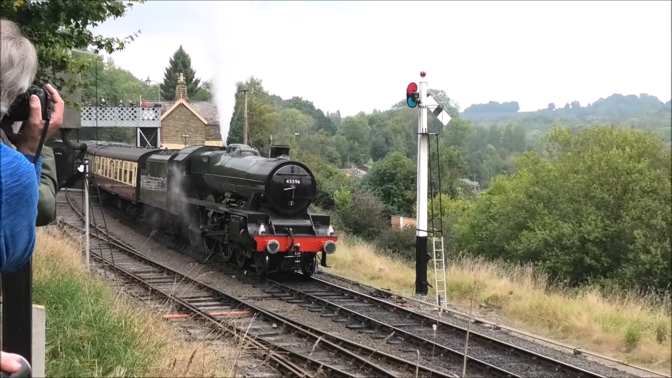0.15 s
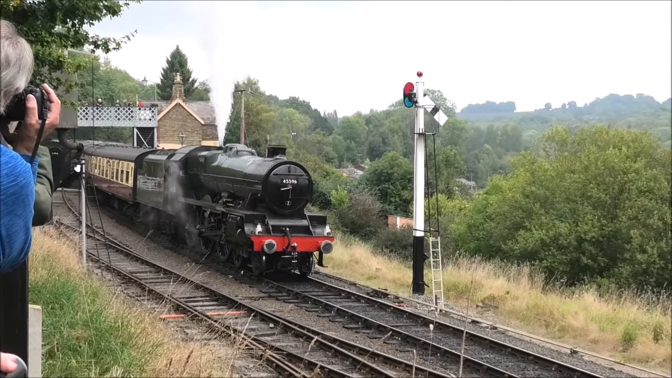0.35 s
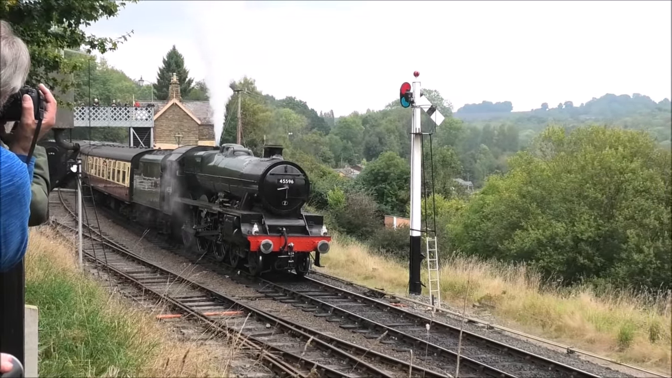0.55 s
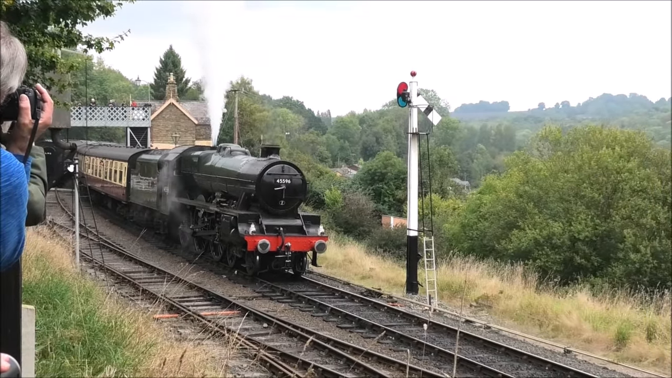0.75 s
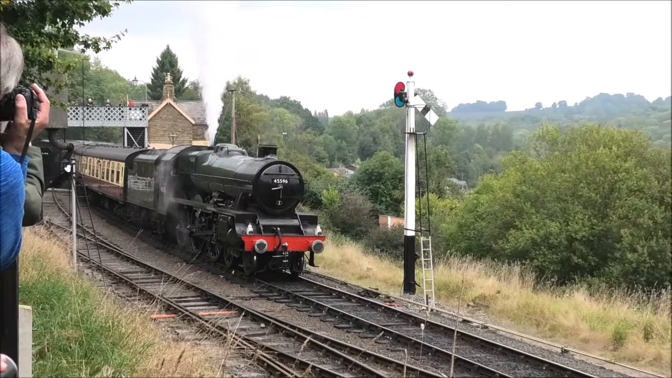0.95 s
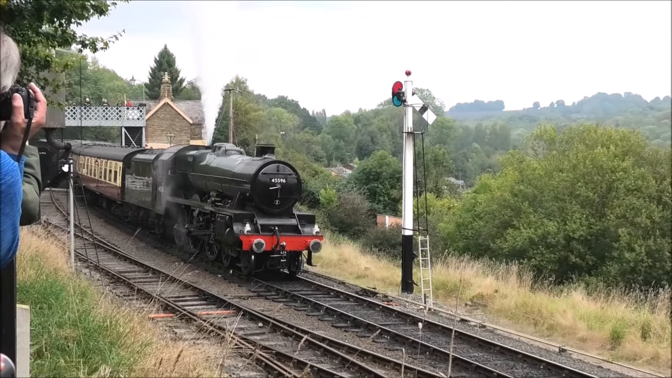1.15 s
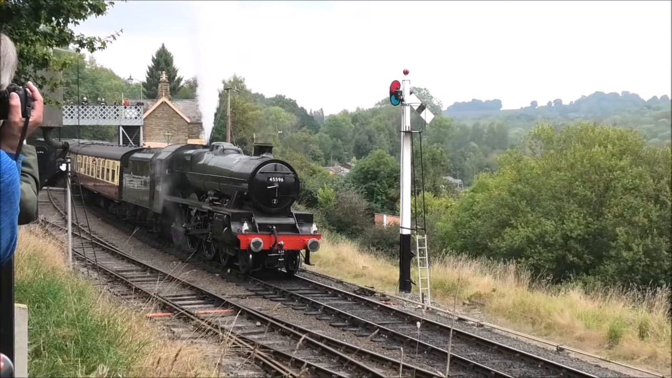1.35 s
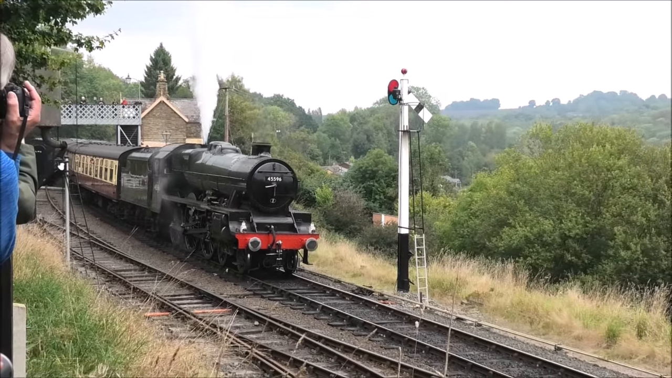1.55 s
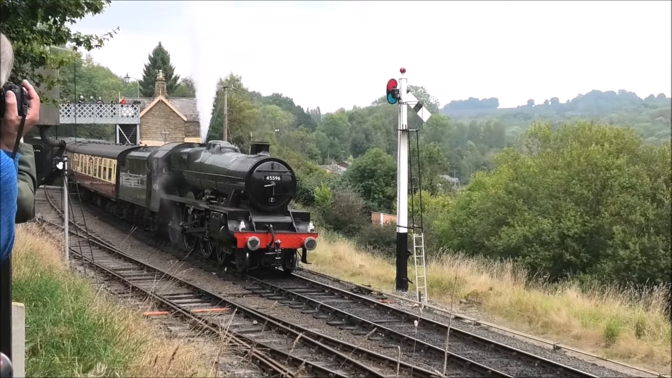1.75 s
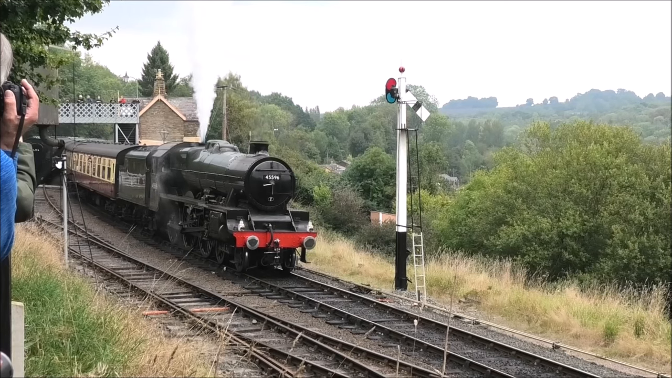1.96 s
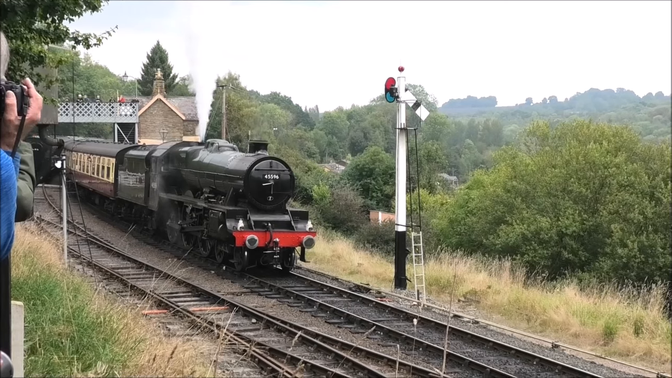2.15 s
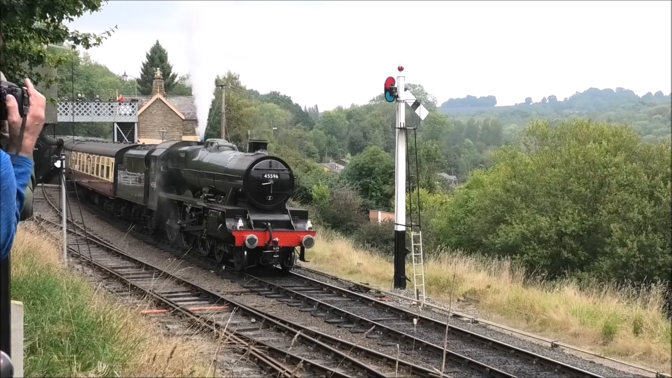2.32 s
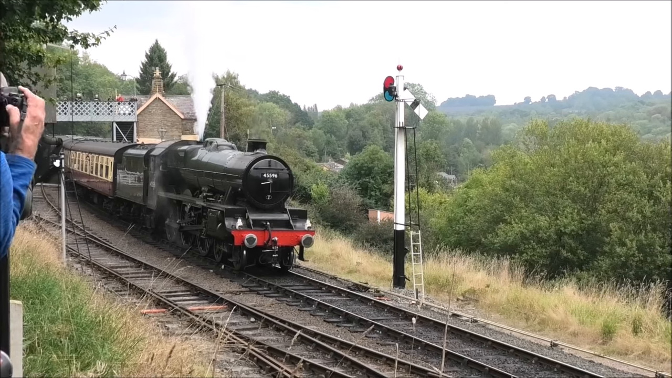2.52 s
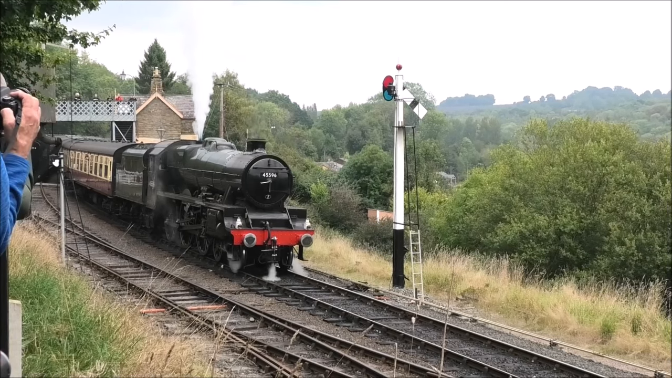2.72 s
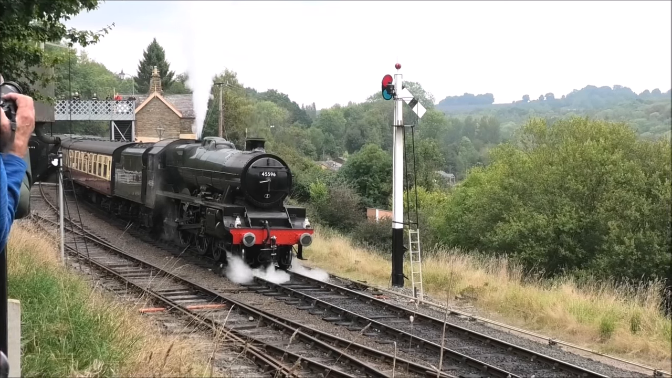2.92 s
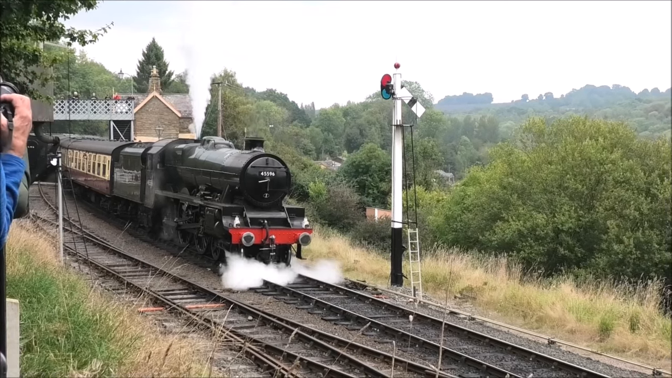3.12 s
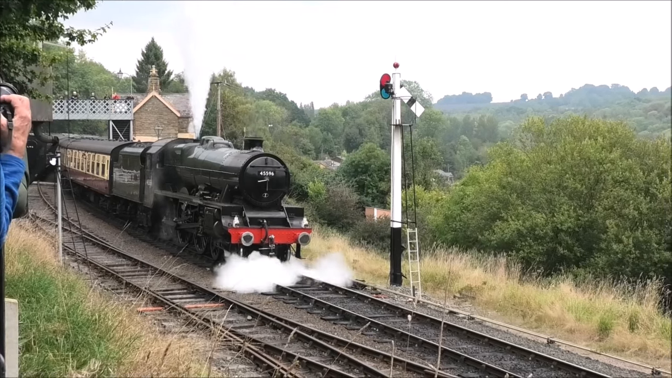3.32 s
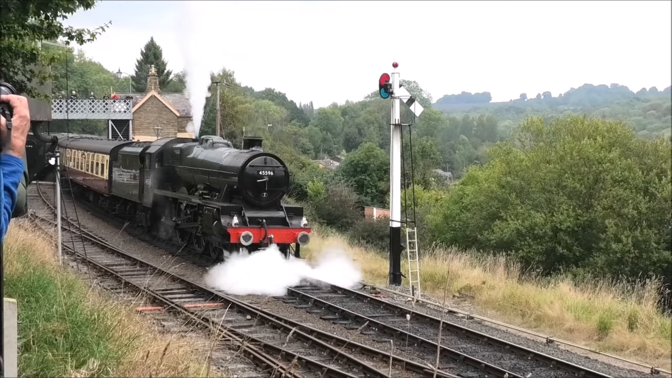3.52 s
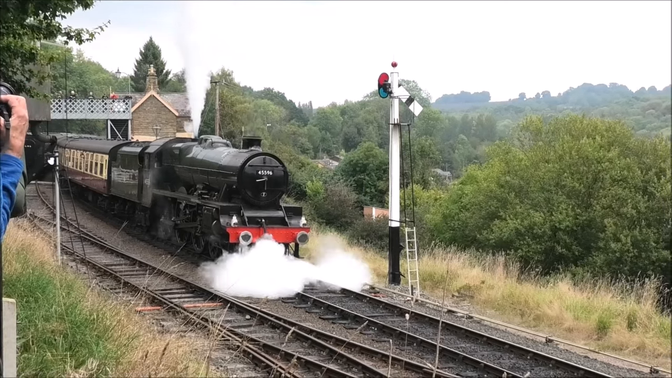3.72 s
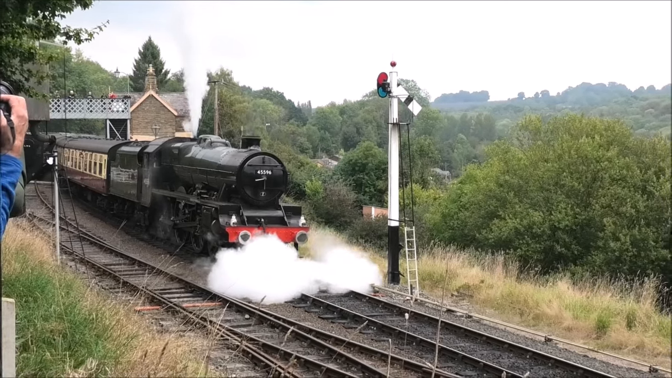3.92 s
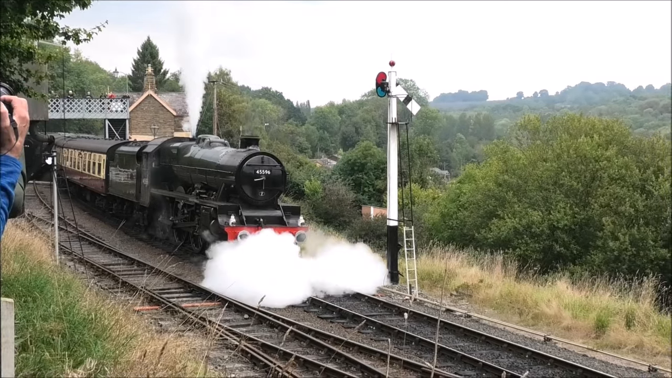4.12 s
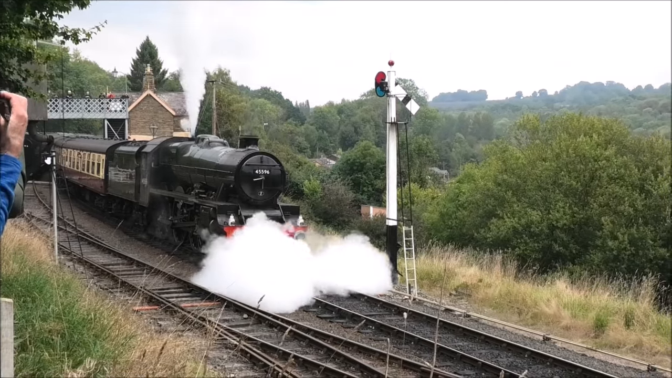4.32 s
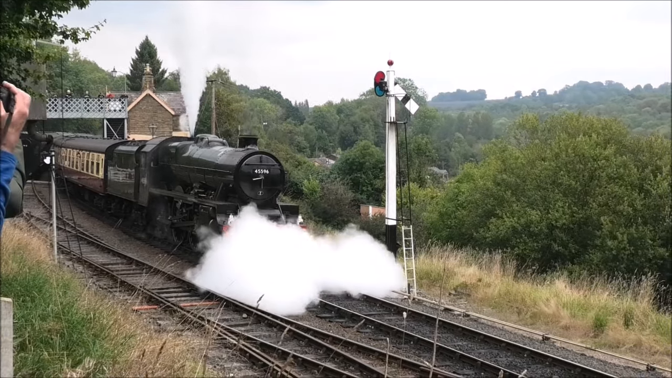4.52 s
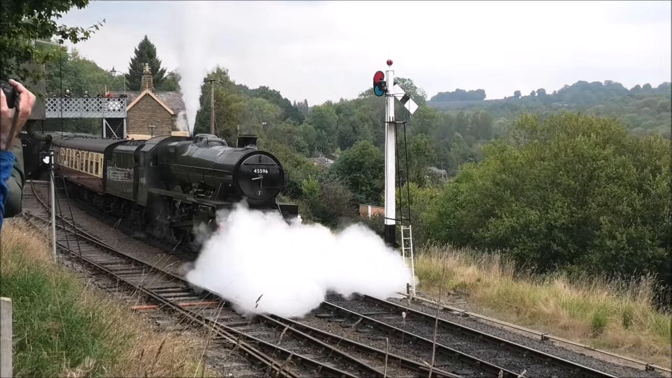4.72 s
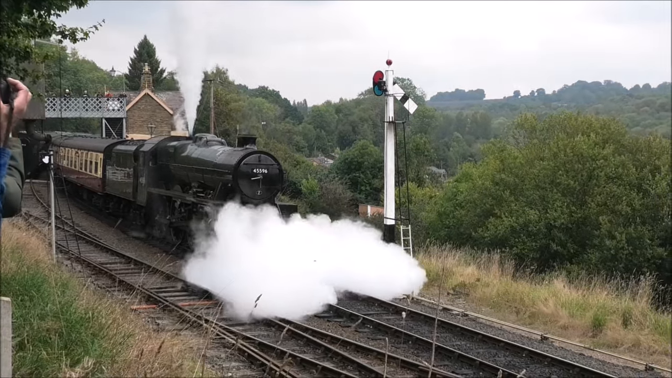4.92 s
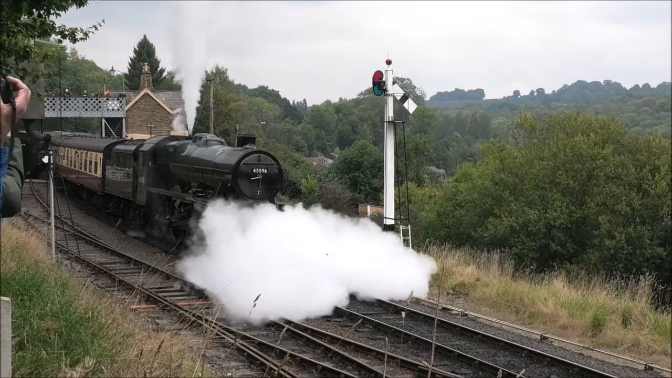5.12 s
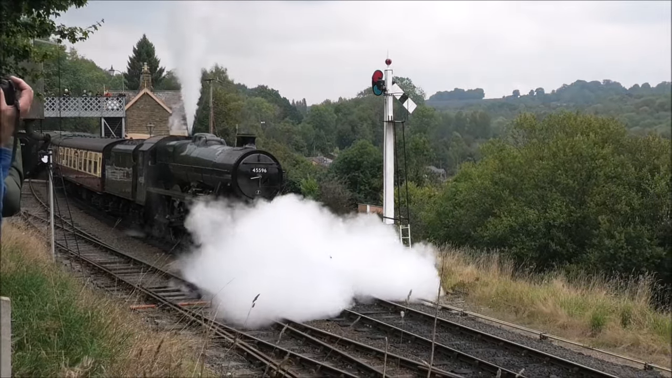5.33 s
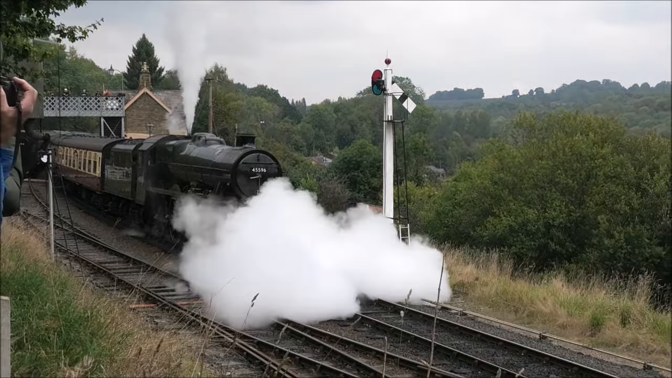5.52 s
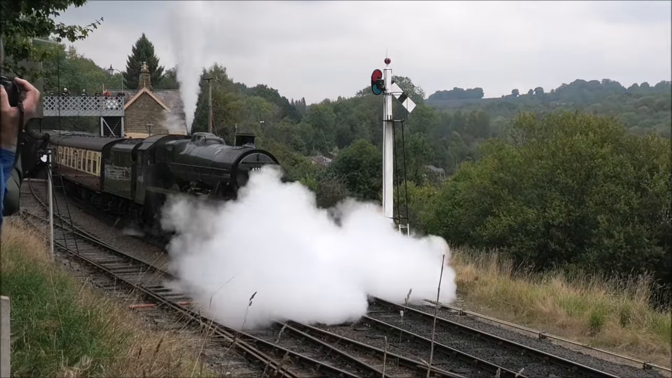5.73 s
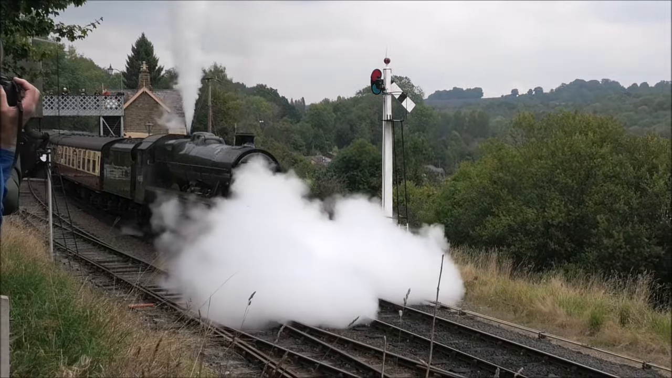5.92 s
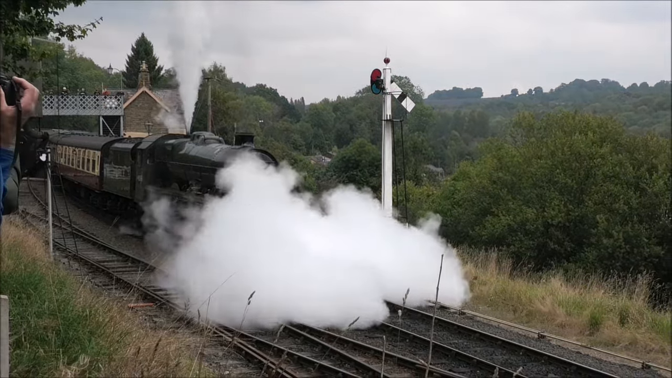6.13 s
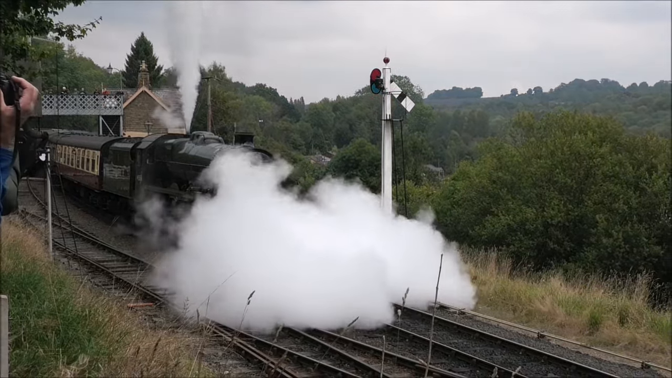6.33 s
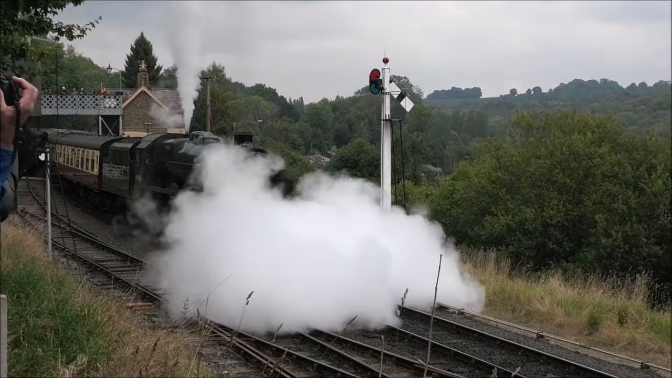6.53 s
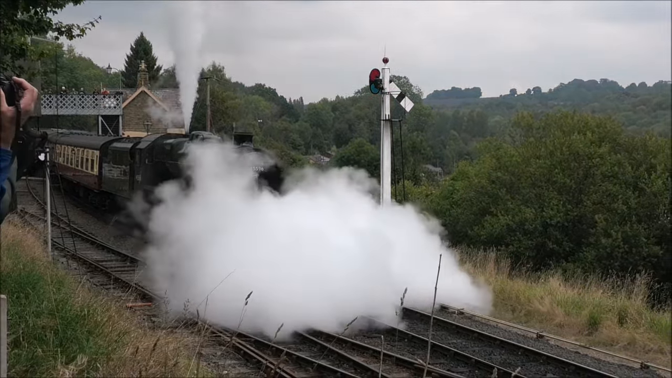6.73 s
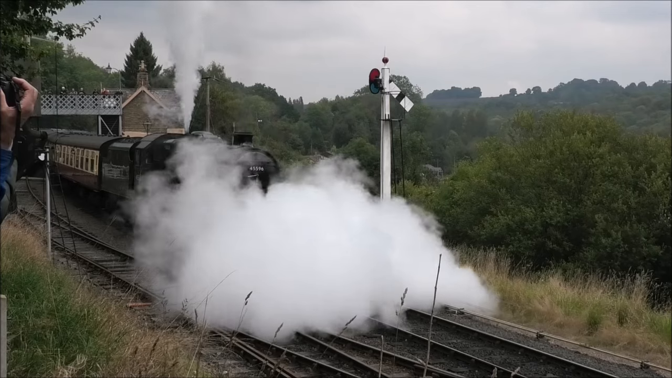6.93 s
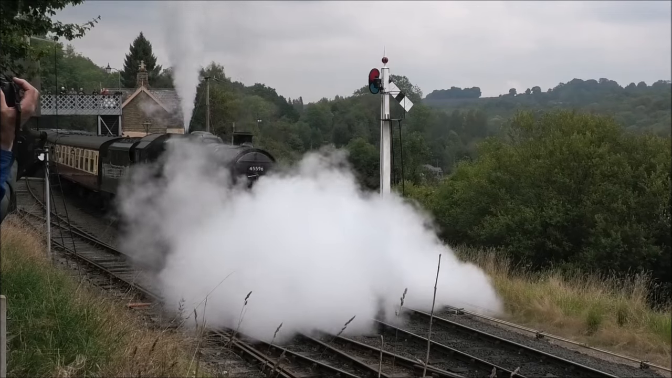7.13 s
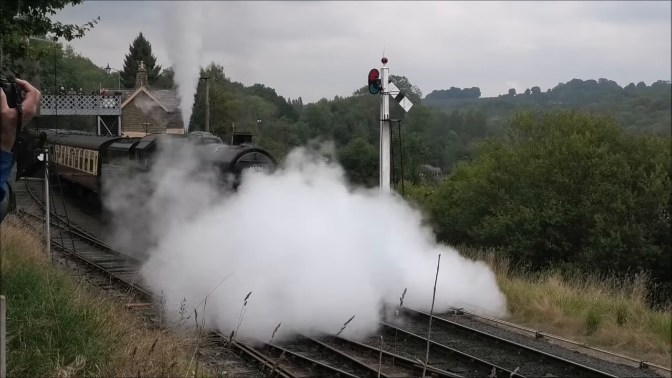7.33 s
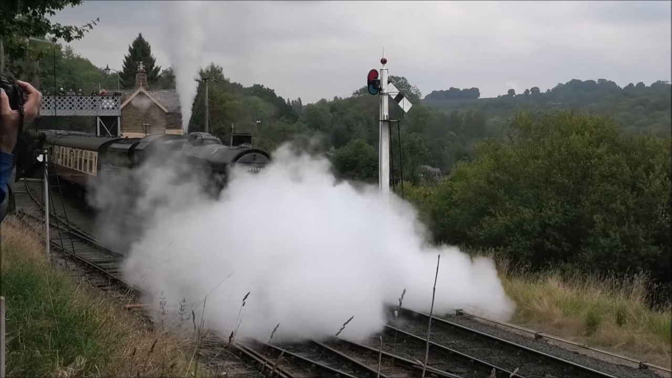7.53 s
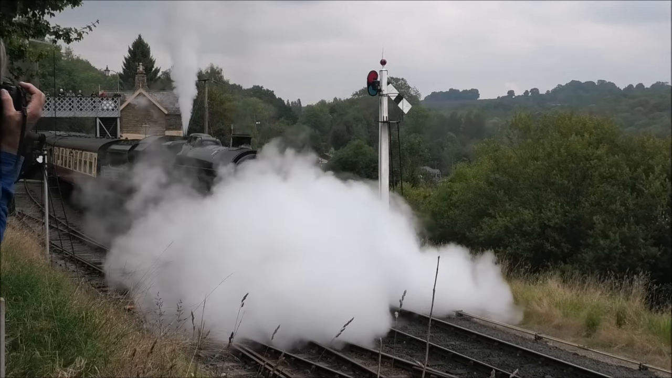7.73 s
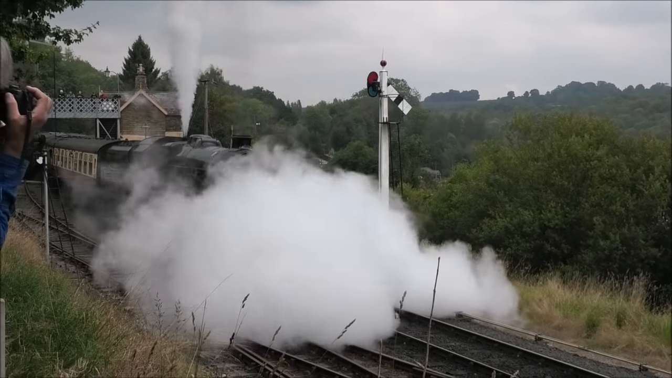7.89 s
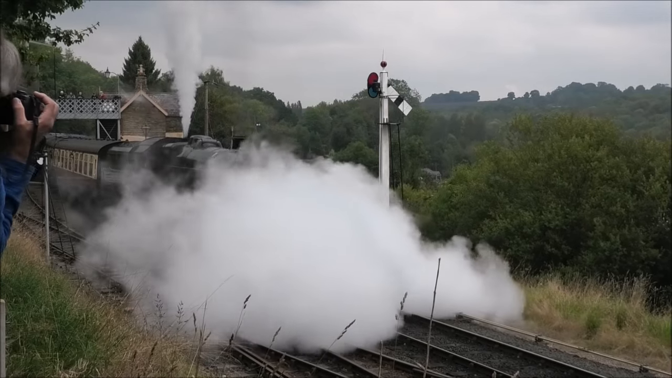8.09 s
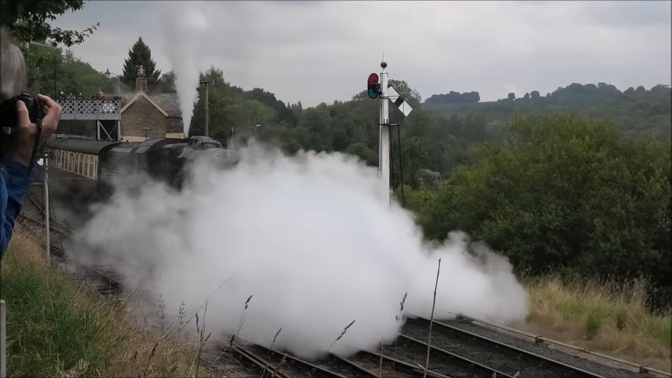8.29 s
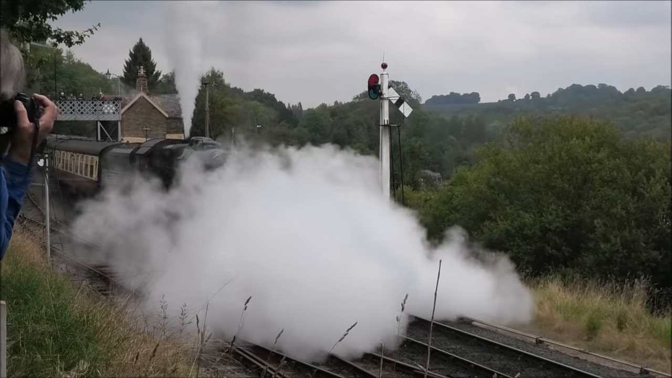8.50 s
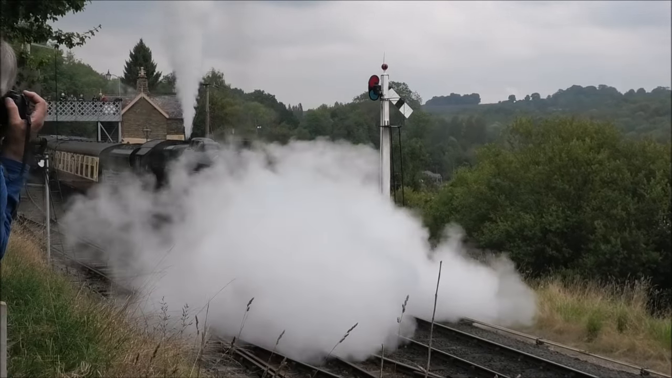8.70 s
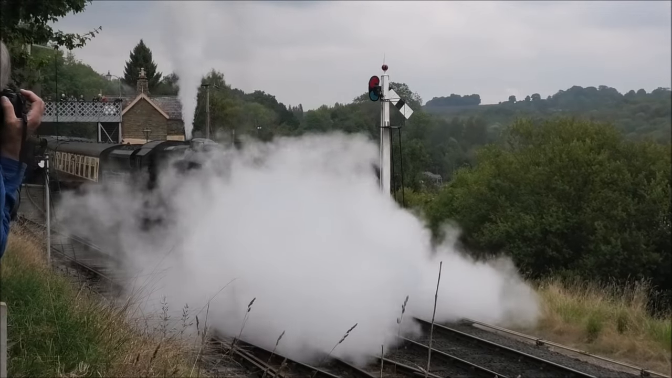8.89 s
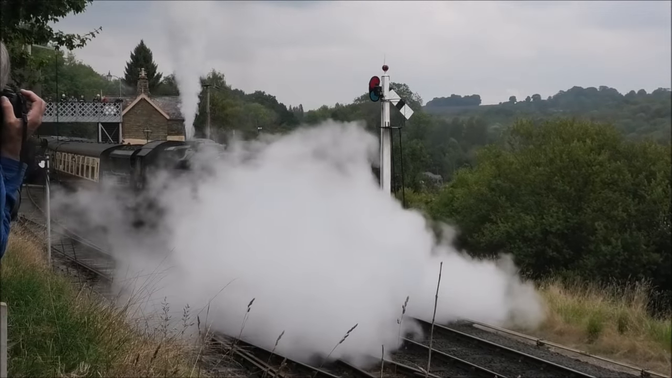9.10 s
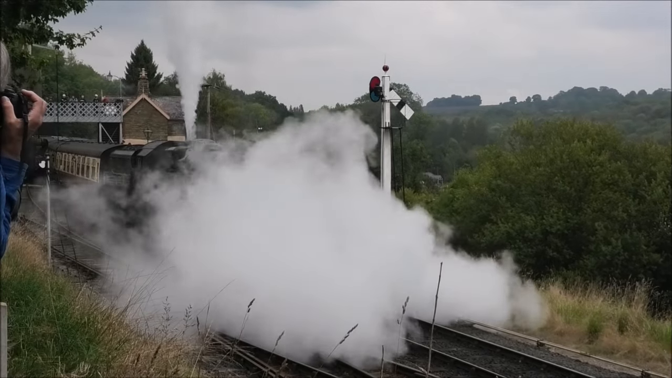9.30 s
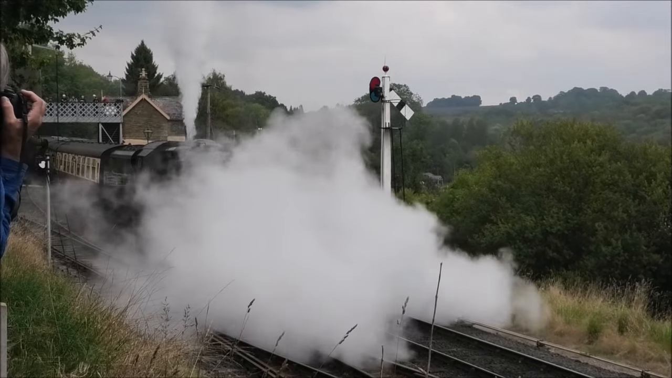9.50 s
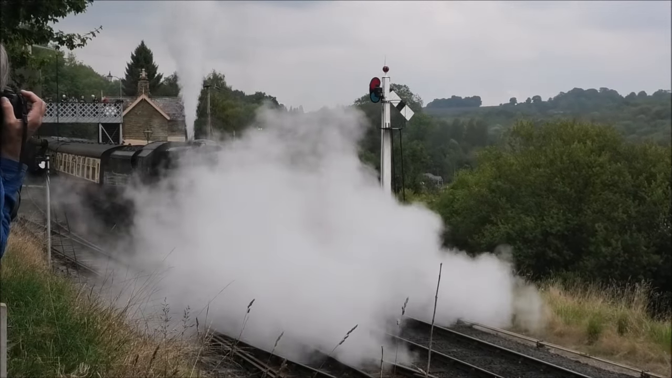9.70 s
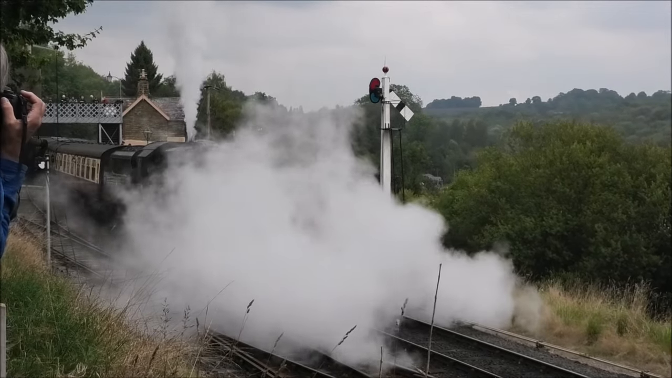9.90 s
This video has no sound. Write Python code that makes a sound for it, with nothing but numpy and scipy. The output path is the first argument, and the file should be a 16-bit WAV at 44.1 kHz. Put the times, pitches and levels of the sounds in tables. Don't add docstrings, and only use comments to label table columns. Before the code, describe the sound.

A steam engine's safety valve roars on while drain cocks blast wet steam for about three seconds, overloading the microphone, then abruptly close.

```python
import sys
import numpy as np
from scipy import signal
from scipy.fft import rfft, irfft, next_fast_len
from scipy.io import wavfile
from scipy.ndimage import uniform_filter1d

SR = 44100
rng = np.random.default_rng(int(sys.argv[2]) if len(sys.argv) > 2 else 0)


def amplitude_ratio(level_db):
    exponent = np.asarray(level_db, float) / 20
    return 10 ** exponent


def transcribe(signal):
    frames = np.atleast_2d(signal).T
    limited = np.clip(frames, -1, 1)
    pcm = np.round(limited * 32767).astype(np.int16)
    wavfile.write(sys.argv[1], SR, pcm)


N = 438779

TIME = np.arange(N) / SR
FFT_SIZE = next_fast_len(N)
HZ = np.arange(FFT_SIZE // 2 + 1) * SR / FFT_SIZE + 1e-3
STEPS = np.arange(0, N / SR + .01, .01)
SHUT_S = 6.374


def walk(rate):
    k = int(SR / rate)
    held = np.repeat(rng.standard_normal(N // k + 1), k)
    return 1.3 * uniform_filter1d(uniform_filter1d(held, k), k)[:N]


def jet(curve, bands, colour, gust_db, flicker_db):
    s, core_db, *rel_db = np.transpose(curve)
    hz, colour_db = np.transpose(colour)
    white = rfft(rng.standard_normal(N), FFT_SIZE)
    noise = white * amplitude_ratio(np.interp(np.log(HZ), np.log(hz), colour_db))
    power = 2 * np.abs(noise) ** 2 / (N * FFT_SIZE)
    own_db = [10 * np.log10(power[(HZ > lo) & (HZ < hi)].sum()) for lo, hi in bands]
    wanted_db = np.array([core_db] + [core_db + r for r in rel_db])
    gain_db = wanted_db - np.array(own_db)[:, None]
    centre = np.log2(np.prod(bands, axis=1)) / 2
    order = np.argsort(centre)
    out = 0
    gust = gust_db * walk(16)
    before = walk(14)
    for octave in np.arange(4.5, 14.6, .5):
        mask = np.cos(np.pi / 2 * np.clip(2 * (np.log2(HZ) - octave), -1, 1)) ** 2
        slow_db = [np.interp(octave, centre[order], g[order]) for g in gain_db.T]
        slow_db = np.interp(TIME, s, slow_db, left=-200, right=-200)
        fresh = walk(14)
        slice_db = slow_db + gust + flicker_db * (fresh + before)
        out = out + amplitude_ratio(slice_db) * irfft(noise * mask, FFT_SIZE)[:N]
        before = fresh
    return out


def stirred(steady_db, bands, eddies, opening_db, s):
    core_hz, reach_oct = 3075, .65
    octave = np.log2(np.sqrt(np.prod(bands, axis=1)) / core_hz)[:, None]
    db = np.array(steady_db)[:, None] + opening_db
    for at_s, length_s, gain_db, pitch in eddies:
        in_time = (2 * (s - at_s) / length_s) ** 2
        in_pitch = ((octave - pitch) / reach_oct) ** 2
        db = db + gain_db * np.exp(-in_time - in_pitch)
    return np.vstack([s, db[0], db[1:] - db[0]]).T


def tone(curve, wobble, rate, rough_db):
    s, hz, db = np.transpose(curve)
    phase = 2 * np.pi * np.cumsum(np.interp(TIME, s, hz) * (1 + wobble * walk(rate))) / SR
    fade = np.clip(np.minimum(TIME - s[0], s[-1] - TIME) / 0.029, 0, 1)
    level = amplitude_ratio(np.interp(TIME, s, db) + rough_db * walk(rate))
    return np.sqrt(2) * fade * level * np.sin(phase)


def valve():
    # low f/Hz, high f/Hz
    valve_bands = [(2200, 4300), (300, 1200), (5000, 9000), (9500, 15500)]
    # f/Hz, density/dB
    valve_colour = [(25, -29), (200, -26.5), (310, -19), (560, -12), (1150, -17.5), (1700, -15.5),
                    (2350, -8), (2800, -6), (3500, 0), (3900, -5), (4500, -14), (8100, -11), (11500, -10),
                    (15600, -11)]
    valve_levels = [-22.5, -35.5, -27.5, -28.5]
    # t/s, length/s, gain/dB, pitch above the core/octaves
    valve_eddies = [(.15, 0.71, 8, -2), (0.446, 0.57, 5, 1.3), (.4, 1.1, 2.8, 0.5), (0.557, .15, 1.5, 1.5),
                    (1.212, 0.48, 9.5, 1.36), (1.47, .2, 23, 14), (1.716, 0.17, 2.5, 0.5),
                    (2.04, .24, 5.5, 2), (2.435, 1.4, 4.5, -2.5), (2.648, 0.31, 7.5, 2),
                    (3.154, 0.32, -7, -2), (5.096, .8, 5, -2), (6.66, 0.22, 3, 1.5),
                    (6.822, 0.31, 9.5, 1.4), (6.953, 0.37, 4, 2.5), (7.0, .12, 1.5, 0), (7.328, 0.33, 2, 1),
                    (7.62, 0.2, 3, 2), (7.846, 0.23, 4.5, 2), (8.1, 1.1, 1, -0.2), (8.11, 1.55, 8, -1.5),
                    (8.2, 0.83, 1.6, 0.5), (8.26, .2, 4.5, 2.2), (8.52, .22, 4.5, 1), (8.66, 0.43, 5, 1.5),
                    (9.1, .55, 1.7, 0), (9.468, 0.16, -3.5, 0.5), (9.7, .8, 6, -2), (9.759, 0.28, 6.5, 1.5),
                    (9.94, .12, 3, -0.5)]
    duck_from_s, duck_full_s, duck_db = 2.9, 3.9, -4.5
    hold_s, recover_s = 0.13, 0.47
    back_s = SHUT_S + hold_s
    turns_s = [duck_from_s, duck_full_s, back_s, back_s + recover_s]
    ducking = np.interp(STEPS, turns_s, [0, duck_db, duck_db, 0])
    curve = stirred(valve_levels, valve_bands, valve_eddies, ducking, STEPS)
    return jet(curve, valve_bands, valve_colour, gust_db=.3, flicker_db=.55)


def cocks():
    # low f/Hz, high f/Hz
    cocks_bands = [(2200, 4300), (900, 2100), (6500, 11000), (11000, 15500), (20, 150)]
    # f/Hz, density/dB
    cocks_colour = [(25, -23), (500, -28), (1050, -12), (1500, -9.5), (2500, -9), (2900, -5), (3400, -0.5),
                    (3900, -7), (4400, -13), (4800, -11.5), (5600, -13.5), (9200, -15), (11800, -25),
                    (15600, -25.5)]
    cocks_levels = [-14, -20, -20, -26, -48.5]
    # t/s, level below full blast/dB
    opening = [
        (2.7, -18.5),
        (2.92, -10.5),
        (3.14, -7.5),
        (3.5, -2),
        (4.0, 0),
    ]
    # t/s, length/s, gain/dB, pitch above the core/octaves
    slugs = [(2.97, .18, 4, 0), (3.1, .55, -8.5, -5.8), (3.4, .35, 6, 2.1), (3.62, .3, 4, 2.2),
             (3.66, .65, 4, 0), (3.9, .2, 5, 2.1), (4.13, .2, 1.5, .3), (4.38, .15, 1.2, 0),
             (4.5, .25, 4, 2), (4.75, .3, 3, 2.3), (4.85, .35, 2, .2), (4.95, .3, 5.5, 1.5),
             (5.15, .3, 2.8, .1), (5.42, .35, 2, 0), (5.53, .17, 2.5, 1.2), (5.68, .3, 4, 0),
             (5.84, .2, 6.5, 1.8), (6.1, .3, 2, 2.3), (6.31, .19, 9, 1.3), (6.33, .12, 2.5, -1.2)]
    closing = [(SHUT_S, 0), (SHUT_S + .014, -17.5), (SHUT_S + .076, -35)]
    at_s, db = np.transpose(opening + closing)
    s = np.r_[STEPS[(STEPS > at_s[0]) & (STEPS < SHUT_S)], at_s[-3:]]
    curve = stirred(cocks_levels, cocks_bands, slugs, np.interp(s, at_s, db), s)
    return jet(curve, cocks_bands, cocks_colour, gust_db=.25, flicker_db=.4)


def moans():
    # t/s, length/s, f/Hz, level/dB
    short_moans = [
        (2.74, 0.21, 86.4, -42.5),
        (3.09, .15, 80, -48),
        (6.657, .03, 81, -53),
        (6.875, .04, 77, -45),
        (6.97, .07, 82, -47),
        (9.465, .05, 86, -45),
        (9.593, .06, 80, -44),
        (9.695, 0.036, 70, -47),
        (9.82, .05, 76, -43),
        (9.91, .04, 72.8, -42),
    ]
    # t/s, f/Hz, level/dB
    long_moan = [
        (8.84, 146, -47),
        (8.88, 143, -48),
        (9.0, 137, -54.5),
        (9.11, 134, -47),
        (9.28, 118.4, -46),
        (9.44, 88, -57),
    ]
    attack_s, sag_hz_s, fade_db_s = .03, 50, 42.5
    curves = []
    for s, length, hz, db in short_moans:
        end = (s + length, hz - sag_hz_s * length, db - fade_db_s * length)
        curves.append([(s - attack_s, hz, db - 8), (s, hz, db), end])
    return sum(tone(c, wobble=.012, rate=12, rough_db=1.2) for c in curves + [long_moan])


def whistle():
    start_s, start_hz, rest_hz, sink_s = 3.65, 14490, 9638, .76
    peak_db, rise_db_s, held_s, fade_db_s = -21, 80, .28, 38
    s = np.arange(-.18, .95, .01)
    db = peak_db + rise_db_s * np.minimum(s, 0) - fade_db_s * np.maximum(s - held_s, 0)
    hz = rest_hz + (start_hz - rest_hz) * np.exp(-s / sink_s)
    return tone(np.transpose([start_s + s, hz, db]), wobble=.003, rate=70, rough_db=3.)


def puffs():
    # t/s, length/s, level/dB
    puff_events = [
        (3.76, .22, -41),
        (3.87, .09, -41),
        (4.43, .2, -43),
        (4.98, .12, -36),
        (5.1, .16, -38),
        (5.3, .09, -43),
        (5.65, .5, -45),
        (6.3, .14, -42),
        (6.48, .3, -45),
    ]
    low = signal.butter(2, 180, fs=SR, output="sos")
    flutter = signal.sosfilt(low, rng.standard_normal(N))
    size = sum(amplitude_ratio(db) * np.exp(-(2 * (TIME - s) / length) ** 2) for s, length, db in puff_events)
    push = 1.3 * (1 + walk(28))
    return size * (push + flutter / flutter.std())


def valve_rush(lo_hz, hi_hz):
    # peak t/s, level/dB
    swells = [
        (8.1, -36.5),
        (9.55, -31.5),
    ]
    rise_db_s, fall_db_s = 20, 8
    sos = signal.butter(2, [lo_hz, hi_hz], "band", fs=SR, output="sos")
    band = signal.sosfilt(sos, rng.standard_normal(N))
    size = 0
    for s, db in swells:
        size = size + amplitude_ratio(db + np.minimum(rise_db_s * (TIME - s), fall_db_s * (s - TIME)))
    return band / band.std() * size * amplitude_ratio(1.7 * walk(10))


def scene():
    mono = valve() + cocks() + moans() + whistle() + puffs() + valve_rush(900, 1800)
    return np.tile(mono, (2, 1))


def lapped(window):
    hop = len(window) // 2
    n, k = np.arange(2 * hop), np.arange(hop)[:, None]
    return np.sqrt(2 / hop) * window * np.cos(np.pi / hop * (n + .5 + hop / 2) * (k + .5))


def starve(x, usual_db, starved_db, follow):
    starved_s = [1.991, 2.631, 2.674, 3.122, 3.357, 3.805, 3.890, 3.911, 4.231, 4.829, 4.914, 5.042, 6.151,
                 6.813, 6.941, 8.221, 8.285, 8.306, 8.669, 8.690, 9.650, 9.778, 9.863]
    hop, shift = 941, 671
    basis = lapped(signal.windows.cosine(2 * hop))
    count = N // hop + 3
    padded = np.pad(x, (shift + hop, 3 * hop))
    blocks = padded[:(count + 1) * hop].reshape(count + 1, hop)
    lines = np.hstack([blocks[:-1], blocks[1:]]) @ basis.T
    local = uniform_filter1d(lines ** 2, size=41, axis=1) + 1e-12
    step = amplitude_ratio(usual_db) * np.sqrt(uniform_filter1d(lines ** 2, size=9, axis=1) + 1e-12)
    poor = np.round((np.array(starved_s) * SR + shift) / hop).astype(int)
    overall = local[poor].mean(axis=1, keepdims=True)
    step[poor] = amplitude_ratio(starved_db) * np.sqrt(local[poor] ** follow * overall ** (1 - follow))
    frames = (np.round(lines / step) * step) @ basis
    return (frames[1:, :hop] + frames[:-1, hop:]).ravel()[shift:shift + N]


def side_noise(mid, side_db):
    fill_edges = np.r_[196, 216, 240, 264, 292, np.arange(320, 737, 32)]
    fills_per_s, same_frame, wide_share = 7.5, .33, .25
    hop, grid = 1024, 596
    count = int(fills_per_s * N / SR)
    basis = lapped(signal.windows.kaiser_bessel_derived(2 * hop, 4 * np.pi))
    side = np.zeros(N)
    draws = rng.standard_normal((count, hop))
    start = grid
    for n, ((when, again, where, wide), draw) in enumerate(zip(rng.random((count, 4)), draws)):
        if again > same_frame:
            start = grid + hop * int((n + 2 * when) / (count + 1) * (N // hop - 3))
        k = int(where * (len(fill_edges) - 2))
        last = min(k + 2 + (wide < wide_share), len(fill_edges) - 1)
        band = slice(fill_edges[k] + 2, fill_edges[last] - 2)
        size = np.std(basis[band] @ mid[start:start + 2 * hop])
        side[start:start + 2 * hop] += amplitude_ratio(side_db) * size * draw[band] @ basis[band]
    return side


def band_limit(x):
    return signal.sosfilt(signal.butter(12, 15830, fs=SR, output="sos"), x)


def record(dry):
    crest, trough, knee = .57, .46, 8
    top = np.where(dry[0] > 0, crest, trough)
    mono = dry[0] / (1 + np.abs(dry[0] / top) ** knee) ** (1 / knee)
    mono = signal.lfilter(*signal.butter(1, 1.6, "high", fs=SR), mono)
    mono = starve(mono, usual_db=-5, starved_db=14.0, follow=0.54)
    side = side_noise(mono, side_db=-2.5)
    return band_limit(np.array([mono + side, mono - side]))


dry = scene()
out = record(dry)
transcribe(out)
```